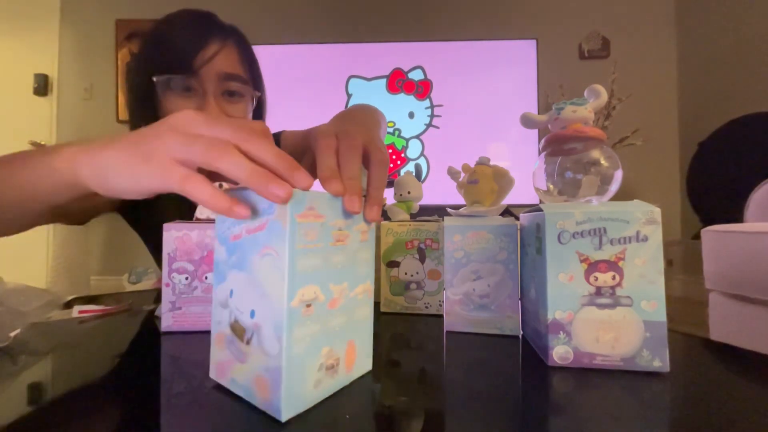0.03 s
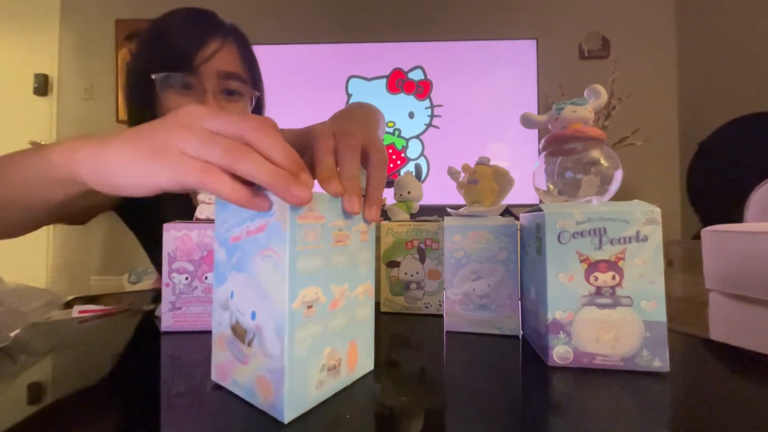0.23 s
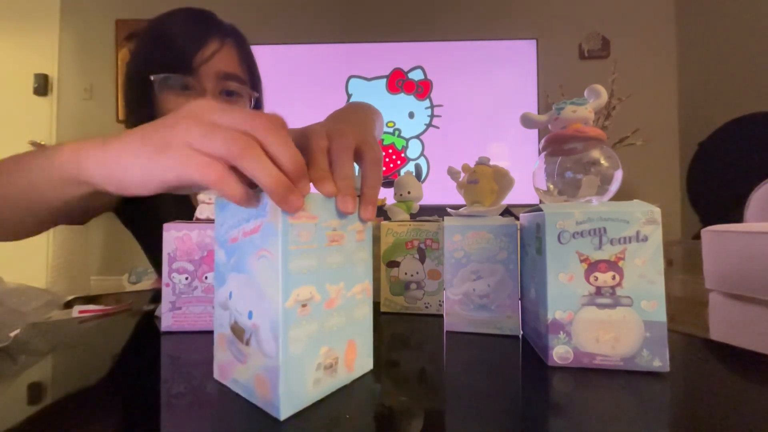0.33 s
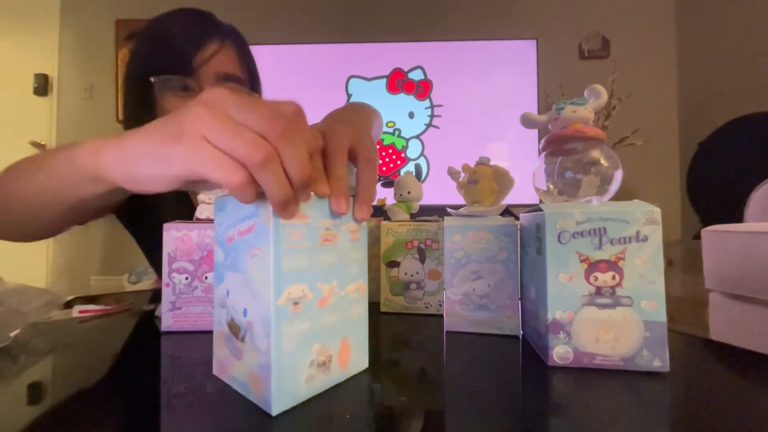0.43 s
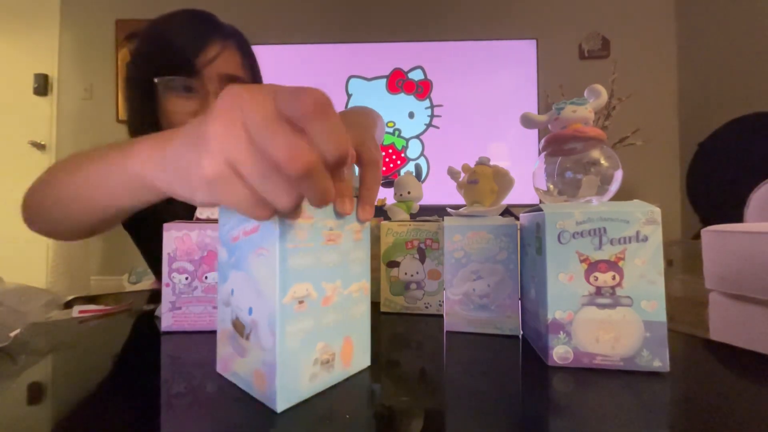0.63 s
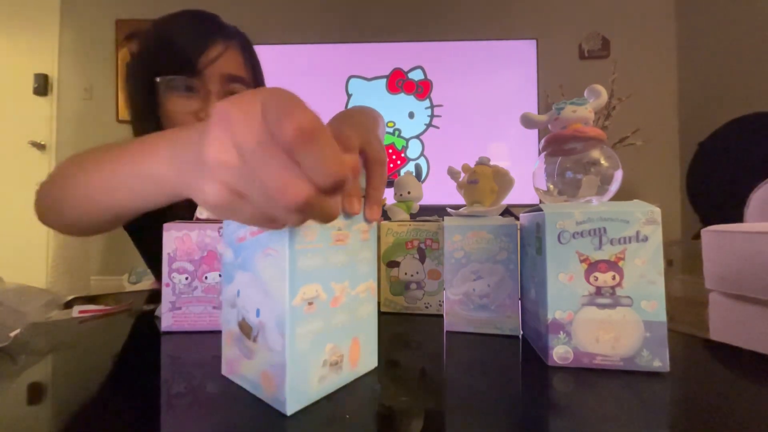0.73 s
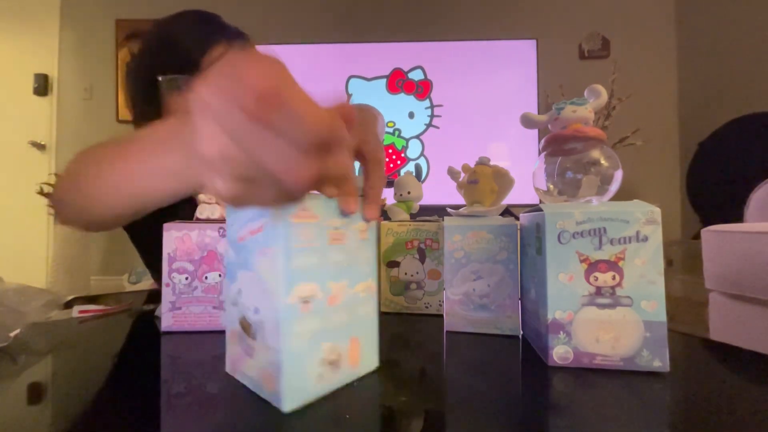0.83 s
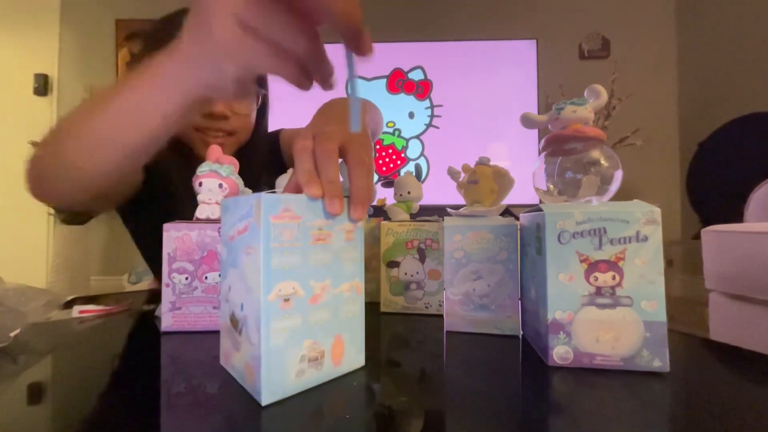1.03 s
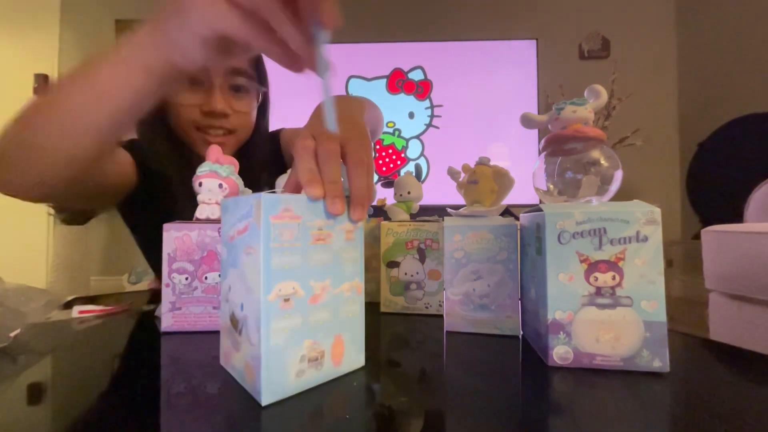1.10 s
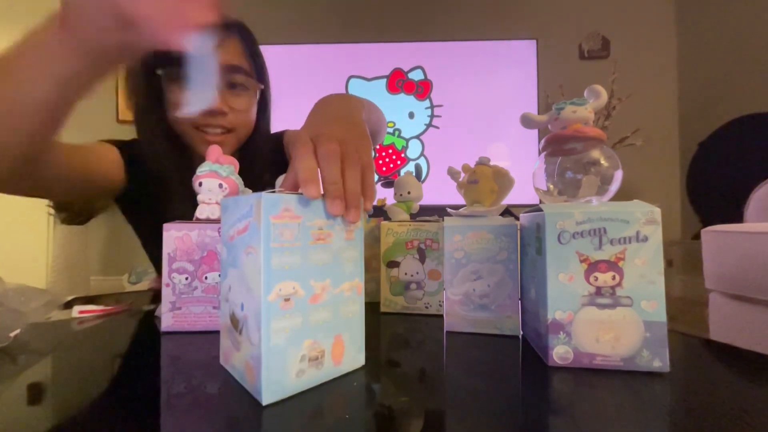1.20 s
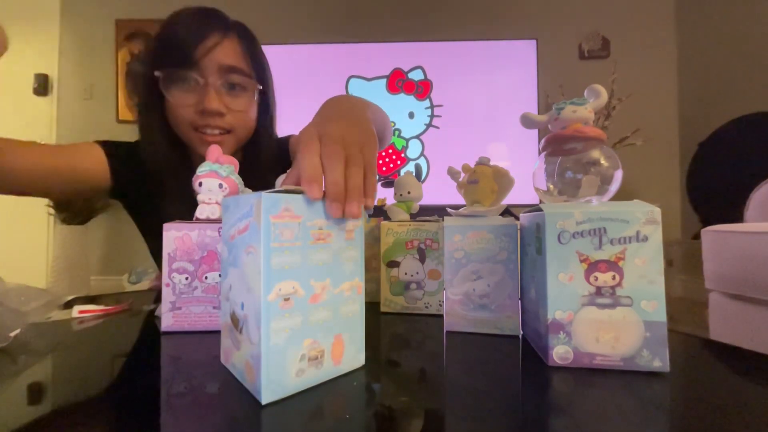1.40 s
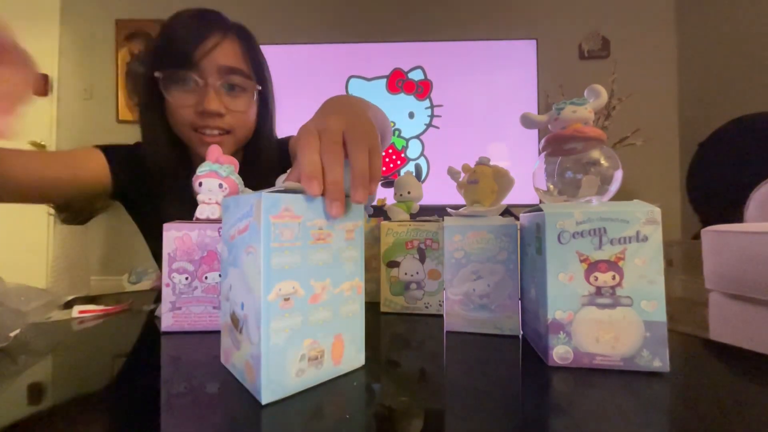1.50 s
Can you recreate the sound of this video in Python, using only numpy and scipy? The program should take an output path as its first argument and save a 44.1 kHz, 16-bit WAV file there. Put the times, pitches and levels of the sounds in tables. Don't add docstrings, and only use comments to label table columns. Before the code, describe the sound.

Cardboard ripping along a perforated strip, thumping the table, then a snap and light flap ticks

```python
import sys
import numpy as np
from scipy import signal
from scipy.fft import rfft, irfft
from scipy.io import wavfile
from scipy.ndimage import uniform_filter1d

SR = 44100
rng = np.random.default_rng(int(sys.argv[2]) if len(sys.argv) > 2 else 0)


def convert_level_to_amplitude(level_db):
    exponent = np.asarray(level_db, float) / 20
    return 10 ** exponent


def materialize(psi):
    bounded = np.clip(np.atleast_2d(psi).T, -1, 1)
    quanta = np.round(bounded * 32767).astype(np.int16)
    wavfile.write(sys.argv[1], SR, quanta)


N = 68355

# (frequency [Hz], density [dB per Hz])
AIR_SPECTRUM = [(20, -17), (120, -9), (160, -13), (280, -14), (850, -29.5), (2200, -33), (4200, -40),
                (5500, -62), (14300, -50)]
# (frequency [Hz], correlation [-1..1])
AIR_LIKENESS = [(60, 1), (500, 0.64), (3000, 0.13), (12000, 0.34)]
# (frequency [Hz], t60 [s])
ROOM_DECAY = [(100, 0.39), (500, 0.31), (2000, 0.35), (8000, 0.23)]
# (frequency [Hz], level [dB])
ROOM_SEND = [(60, -26), (120, -17), (300, -7.5), (1000, -7.5), (2500, -0.5), (6000, 0), (10000, 8),
             (13000, -6)]
# (frequency [Hz], difference [dB])
PORT_TILT = [(110, -0.5), (200, -1), (370, 0), (670, 15.5), (1230, 5.5), (2260, 1.5), (4140, 5.9),
             (7580, -1.5)]
# (frequency [Hz], phase [radians])
PORT_LEAD = [(100, 0.32), (800, 0.21), (2500, 1.35), (3900, 1.38), (6000, 4.5), (9000, 5.5), (14000, 7.5)]
# (frequency [Hz], level [dB])
MIC_COLOUR = [(20, -24.5), (60, 0.5), (2100, -1), (2450, -10.5), (3600, -6.5), (4900, 3), (7500, 0),
              (10000, -3.5), (13000, -5.5), (14300, -11), (15300, -60)]
# (start [s], end [s], level [dB])
RUSTLES = [
    (0, .1, -74),
    (.795, .825, -44),
    (1.08, 1.24, -72),
    (1.405, 1.6, -58),
    (1.18, 1.225, -63),
]
# (time [s], peak [dB], ring [Hz], t60 [s], crack peak [dB])
FLAP_TICKS = [(.016, -52, 3630, 0.013, -49), (.067, -61, 1500, .02, -58), (.128, -51, 520, 0.058, -82),
              (.195, -32.5, 492, 0.081, -28), (.261, -28.5, 900, 0.054, -26),
              (.266, -13.5, 188.5, 0.097, -23.5), (.622, -19, 650, 0.014, -44),
              (.93, -35.5, 75, 0.053, -86), (1.096, -42.5, 500, 0.044, -60),
              (1.1405, -50.5, 550, 0.053, -51.5), (1.147, -46, 307, 0.12, -70),
              (1.185, -46, 610, 0.031, -50), (1.262, -47, 1720, 0.016, -42), (1.263, -37, 470, 0.027, -68),
              (1.4078, -37, 780, 0.028, -37.5), (1.408, -64, 2970, 0.011, -70),
              (1.4085, -43.5, 1850, 0.014, -60), (1.408, -42.5, 4000, 0.0094, -52),
              (1.42, -46, 2600, 0.025, -48), (1.451, -56, 4200, .025, -70), (1.415, -40, 132, 0.15, -52),
              (1.426, -47, 409, 0.062, -37.5), (1.4678, -34.5, 1515, 0.0097, -33),
              (1.469, -37.5, 900, 0.021, -39.5), (1.478, -35, 580, 0.026, -55),
              (1.468, -38, 2930, 0.019, -35), (1.472, -35, 469, 0.039, -47), (1.478, -44, 89, 0.18, -68),
              (1.498, -56, 3800, .015, -47), (1.501, -43, 457, 0.031, -76), (1.525, -41, 523, 0.035, -53),
              (1.542, -50, 1300, 0.022, -39), (1.5465, -37, 2010, 0.02, -35),
              (1.547, -44.5, 3980, 0.028, -46)]
# (time [s], peak [dB], ring [Hz], t60 [s], crack peak [dB])
SNAP_KNOCKS = [(.8146, -41, 7600, .015, -42), (.8167, -27, 4400, .016, -41), (.8192, -33, 3000, .025, -52),
               (.8222, -33, 5900, .014, -44), (.833, -40, 4600, .014, -54), (.8177, -11, 1300, .014, -40),
               (.8193, -14, 1250, .014, -44), (.8226, -14, 680, .02, -50), (.8252, -3.5, 550, .016, -60),
               (.821, -17, 950, .015, -47), (.8188, -23, 2080, .017, -51), (.8264, -18, 1040, .028, -51),
               (.8337, -25, 610, .028, -51), (.808, -29, 112, .065, -63), (.823, -23, 98, .11, -63),
               (.83, -29, 205, .055, -63), (.843, -32, 525, .035, -53), (.801, -33, 900, .04, -50)]
# (frequency [Hz], density [dB per Hz])
CRACK_COLOUR = [(300, -6.5), (900, 7.5), (2000, -2.5), (3000, 11), (4200, -7), (6500, -18), (10000, -29),
                (12500, -42), (14000, -61)]
# (frequency [Hz], width [Hz], level [dB])
GRAIN_PITCHES = [(900, 1370, 1.5), (1890, 1270, -1), (3580, 3460, 0.5), (5600, 6500, -2.5),
                 (8120, 5100, 0.5), (11500, 4000, -1.5)]
# (frequency [Hz], density [dB per Hz])
FIBRE_COLOUR = [(180, -10.5), (300, -1.5), (742, -10), (1170, -17), (1720, -18), (2540, -16), (5430, -31),
                (9880, -40.5), (14300, -59)]
# (time [s], peak [dB], colour [Hz])
BUNDLES = [(0.1134, -52, 3920), (0.113, -59, 2890), (0.125, -40, 3540), (0.129, -57, 2960),
           (0.1665, -34, 2900), (0.1764, -49, 2600), (0.192, -43, 2650), (0.2335, -50, 3260),
           (0.2334, -39, 2690), (0.259, -33.5, 3760), (0.2663, -40, 2600), (0.2701, -35, 2680),
           (0.29, -41, 2720), (0.3003, -40, 2600), (0.3196, -41.5, 5600), (0.3414, -30, 3680),
           (0.3471, -25.5, 3310), (0.355, -26, 3990), (0.3644, -34, 3380), (0.3776, -46, 2690),
           (0.3916, -34, 4090), (0.4025, -47, 2630), (0.4217, -36.5, 3950), (0.439, -42, 3190),
           (0.4534, -31, 3080), (0.4632, -45, 4180), (0.477, -44, 3340), (0.5, -42.5, 3380),
           (0.5153, -47, 3150), (0.5228, -31, 2600), (0.542, -43, 3350), (0.5564, -41, 2690),
           (0.5812, -36.5, 5410), (0.5914, -34, 3340), (0.6051, -31, 2690), (0.618, -30, 2680),
           (0.643, -44.5, 3280), (0.6662, -40.5, 3420), (0.6982, -47, 3920), (0.7032, -43.5, 3610),
           (0.77, -43, 5070), (0.778, -38, 2930)]
# (start [s], length [s], thump [dB], slip rate [1/s], crackle [dB])
TAB_TUGS = [(0.104, 0.086, -77, 74, -44.5), (0.163, 0.037, -32, 94.7, -30), (0.229, 0.005, -29.5, 124, -26),
            (0.2592, 0.046, -23.5, 86, -27.5), (0.302, 0.044, -32, 86, -39.5),
            (0.341, 0.045, -21, 119, -21.5), (0.388, 0.056, -26.5, 102.4, -30.5),
            (0.44, 0.016, -52, 152, -25.5), (0.462, 0.058, -21, 109.2, -26.5),
            (0.522, 0.014, -45, 140, -31), (0.539, 0.063, -24, 88.4, -28), (0.604, 0.023, -31, 102, -29),
            (0.637, 0.04, -40.5, 123, -37.5), (0.688, 0.067, -42.5, 89, -45),
            (0.769, 0.067, -38, 127, -38.5)]
# (frequency [Hz], density [dB per Hz])
THUMP_COLOUR = [(24, -52), (40, -13.5), (97, 0.5), (222, 1), (355, -14), (714, -5.5), (978, -36),
                (1320, -29.5), (2600, -47), (3380, -30), (5720, -120)]
# (frequency [Hz], width [Hz], level [dB])
BOX_MODES = [(114, 110, -10), (194, 100, -12.5), (463, 57, -11), (498, 230, -11.5), (702.7, 34, -1.5),
             (1282, 50, -9), (1830, 500, -22)]


def evened(x):
    return x / np.sqrt(np.mean(x ** 2) + 1e-20)


def read(points, hz):
    f, value = np.transpose(points)
    return np.interp(np.log(hz + 1), np.log(f + 1), value)


def add(mix, s, sound):
    part = mix[round(s * SR):][:len(sound)]
    part += sound[:len(part)]


def colour(x, points, late_s=0, corner_hz=1000):
    hz = np.fft.fftfreq(4096, 1 / SR)
    log_gain = np.log(convert_level_to_amplitude(np.maximum(read(points, abs(hz)), -100)))
    lag = 2 * np.pi * late_s * corner_hz * np.arctan(hz / corner_hz)
    phase = signal.hilbert(log_gain).imag + lag
    taps = np.fft.ifft(np.exp(log_gain - 1j * phase)).real[:3000]
    return signal.oaconvolve(x, taps)[:len(x)]


def ring(x, hz, width_hz):
    r = np.exp(-np.pi * width_hz / SR)
    return 2 * signal.lfilter([1 - r], [1, -r * np.exp(2j * np.pi * hz / SR)], x).real


def air():
    hz = np.fft.rfftfreq(N, 1 / SR)
    left, other = rfft(rng.standard_normal((2, N)))
    same = np.clip(read(AIR_LIKENESS, hz), -1, 1)
    right = same * left + np.sqrt(1 - same ** 2) * other
    spectra = np.array([left, right]) * convert_level_to_amplitude(read(AIR_SPECTRUM, hz))
    return convert_level_to_amplitude(-57.5) * evened(irfft(spectra, N))


def room(x):
    taps = np.zeros((2, 20000))
    at = np.arange(60, 19960, 20) + rng.integers(0, 20, (2, 995))
    np.put_along_axis(taps, at, rng.choice([-1., 1.], at.shape), 1)
    hz, t, bands = signal.stft(taps, SR, nperseg=256)
    decay = convert_level_to_amplitude(-60 * t / read(ROOM_DECAY, hz)[:, None])
    tail = signal.istft(bands * decay, SR, nperseg=256)[1]
    return signal.fftconvolve(x[None], tail / np.linalg.norm(tail[0]), axes=1)[:, :N]


def ports(x):
    hz = np.fft.rfftfreq(2 * N, 1 / SR)
    tilt = convert_level_to_amplitude(read(PORT_TILT, hz) / 2) * np.exp(.5j * read(PORT_LEAD, hz))
    pair = np.array([tilt, 1 / tilt]) * 2 / (abs(tilt) + 1 / abs(tilt))
    return irfft(rfft(x, 2 * N) * pair)[:, :N]


def fibres(per_s, spread_db):
    shape = (len(GRAIN_PITCHES), N)
    clumps = evened(uniform_filter1d(rng.standard_normal(shape), 200, axis=1))
    hits = (rng.random(shape) < per_s / SR) * rng.standard_normal(shape) * convert_level_to_amplitude(spread_db * clumps)
    grains = sum(convert_level_to_amplitude(db) * evened(ring(h, hz, width)) * np.sqrt(width)
                 for h, (hz, width, db) in zip(hits, GRAIN_PITCHES))
    return evened(colour(grains, FIBRE_COLOUR))


def rustle():
    t = np.arange(N) / SR
    fade_s = 0.0086
    level = sum(convert_level_to_amplitude(db) * np.clip(np.minimum(t - start, end - t) / fade_s, 0, 1)
                for start, end, db in RUSTLES)
    return level * fibres(per_s=5600, spread_db=-2.0)


def knocks(table):
    droop, buzz, swell_turns = .15, .25, .68
    crack_t60_s, crack_rise_s = .013, .0006
    out, t = np.zeros(N), np.arange(6000) / SR
    noise = rng.standard_normal((len(table), len(t)))
    for (s, db, hz, t60, crack_db), n in zip(table, noise):
        turns = np.cumsum(hz * (1 - droop * np.minimum(t / t60, 1))) / SR
        rattle = evened(ring(ring(n, hz * 2.03, hz), hz * 1.09, hz))
        body = convert_level_to_amplitude(db - 60 * t / t60) * (buzz * rattle - np.sin(2 * np.pi * turns))
        swell = np.sin(np.pi / 2 * np.minimum(t * hz / swell_turns, 1)) ** 2
        crack_level = np.minimum(t / crack_rise_s, 1) * convert_level_to_amplitude(crack_db - 60 * t / crack_t60_s)
        add(out, s, body * swell + crack_level * evened(colour(n, CRACK_COLOUR)))
    return out


def rips():
    rise_s, t60_s, relative_width = .004, 0.046, 0.58
    out, t = np.zeros(N), np.arange(3000) / SR
    noise = rng.standard_normal((len(BUNDLES), 3, len(t)))
    chance = rng.uniform(-1, 1, (len(BUNDLES), 3))
    shape = np.minimum(t / rise_s, 1) * convert_level_to_amplitude(-4.5 - 60 * t / t60_s)
    for (s, db, hz), rows, (low, high, shift) in zip(BUNDLES, noise, chance):
        # (Hz, dB)
        parts = [(hz, 0), (1500, 2.5 + 3 * low), (7600 + 1500 * shift, -9.5 + 4 * high)]
        burst = np.zeros(len(t))
        for n, (f, part_db) in zip(rows, parts):
            width = f * relative_width
            burst += convert_level_to_amplitude(part_db) * evened(ring(ring(n, f, width), f, width))
        add(out, s - rise_s / 2, convert_level_to_amplitude(db) * shape * burst)
    return out


def tugs():
    thump_rise_s, crackle_rise_s, release_s = .005, .006, 0.0091
    thump_sag_db, crackle_sag_db = -2, -4.5
    slowing, jitter, first_slip = .08, .04, .1
    t = np.arange(N) / SR
    thump, crackle, slip_count = np.zeros((3, N))
    wobble = evened(uniform_filter1d(rng.standard_normal(N), 300))
    for start, length, thump_db, rate, crackle_db in TAB_TUGS:
        u = np.clip((t - start) / length, 0, 1)
        free = np.exp(-np.maximum(t - start - length, 0) / release_s)
        thump_rise = np.clip((t - start) / thump_rise_s, 0, 1)
        crackle_rise = np.clip((t - start) / crackle_rise_s, 0, 1)
        thump += free * thump_rise * convert_level_to_amplitude(thump_db + thump_sag_db * u)
        crackle += free * crackle_rise * convert_level_to_amplitude(crackle_db + crackle_sag_db * np.sqrt(u))
        speed = rate * (1 + slowing * (.5 - u) + jitter * wobble)
        turns = np.cumsum((t >= start) * speed) / SR
        slip_count = np.where(t >= start, turns + first_slip, slip_count)
    return thump, crackle, slip_count


def tearing():
    uneven_db, rumble_db, box_db, crackle_bed_db = 2, -8, 10.5, -3
    fibre_gate = .25
    thump, crackle, turns = tugs()
    size = evened(uniform_filter1d(rng.standard_normal(N), 300))
    slips = -evened((np.diff(np.floor(turns), prepend=0) > 0) * convert_level_to_amplitude(uneven_db * size))
    noise = rng.standard_normal(N)
    kicks = thump * (slips + convert_level_to_amplitude(rumble_db) * noise)
    drive = colour(kicks, THUMP_COLOUR, late_s=.002, corner_hz=400)
    drive = drive / np.std(colour(noise, THUMP_COLOUR))
    box = sum((-1) ** k * convert_level_to_amplitude(db) * np.sqrt(100 / width) * ring(kicks, hz, width)
              for k, (hz, width, db) in enumerate(BOX_MODES))
    gate = 1 + fibre_gate * np.cos(2 * np.pi * turns)
    bed = crackle * gate * fibres(per_s=3600, spread_db=3)
    return drive + convert_level_to_amplitude(box_db) * box + convert_level_to_amplitude(crackle_bed_db) * bed


def scene():
    box = tearing() + knocks(SNAP_KNOCKS) + knocks(FLAP_TICKS) + rustle() + rips()
    return ports(box) + convert_level_to_amplitude(-13) * room(colour(box, ROOM_SEND)) + air()


def top_cut(x):
    return signal.sosfilt(signal.butter(12, 14480, fs=SR, output="sos"), x)


def record(dry):
    mix = np.array([colour(x, MIC_COLOUR) for x in dry])
    return top_cut(mix)


dry = scene()
out = record(dry)
materialize(out)
```